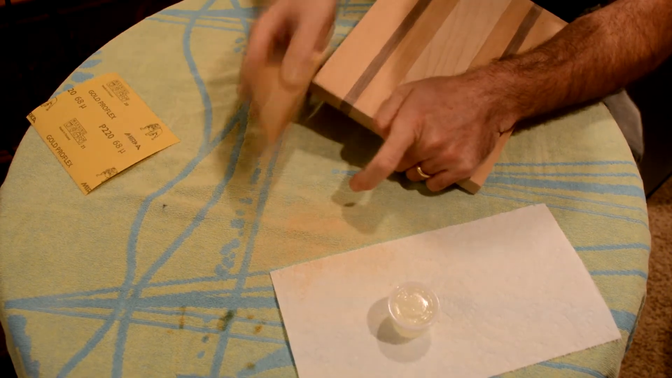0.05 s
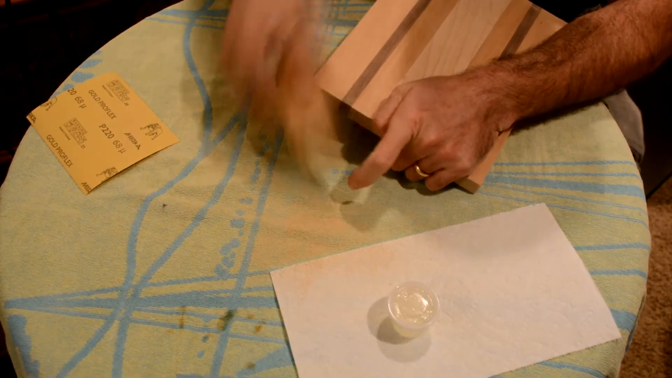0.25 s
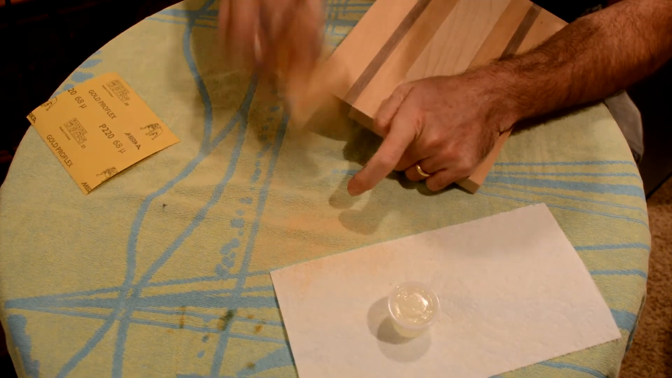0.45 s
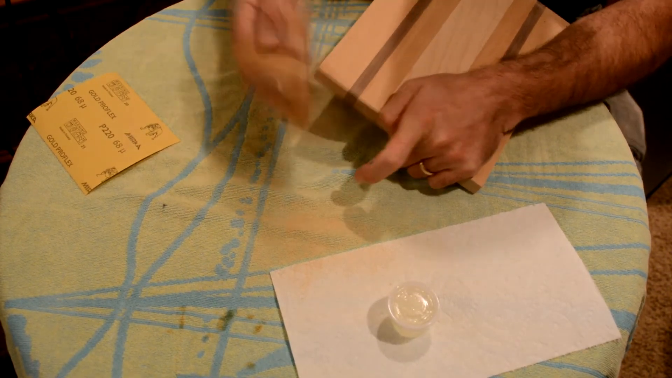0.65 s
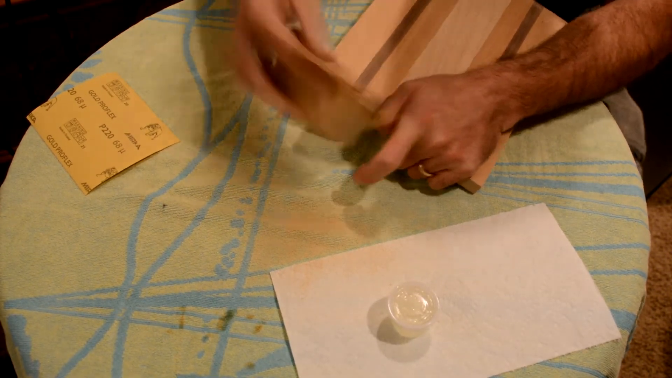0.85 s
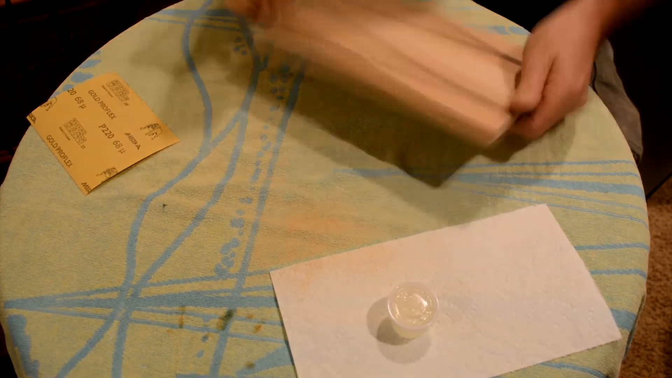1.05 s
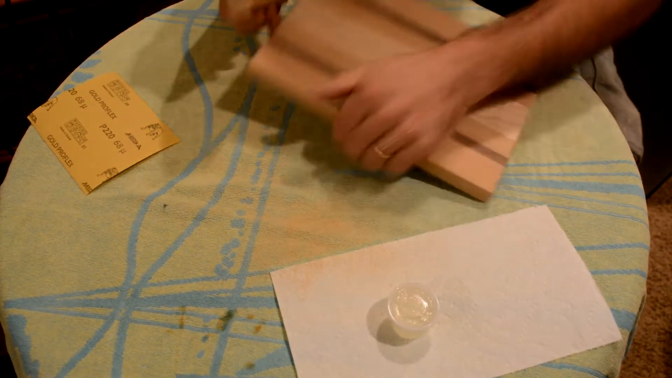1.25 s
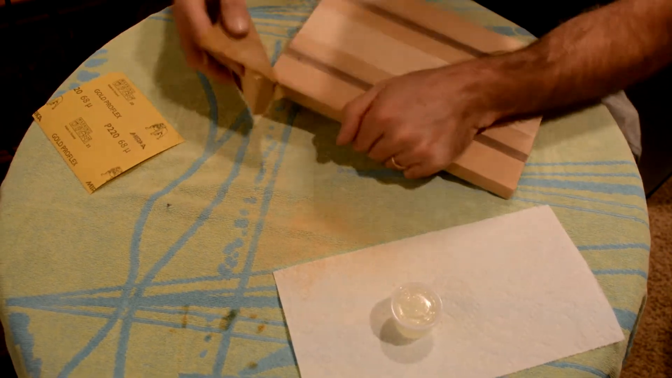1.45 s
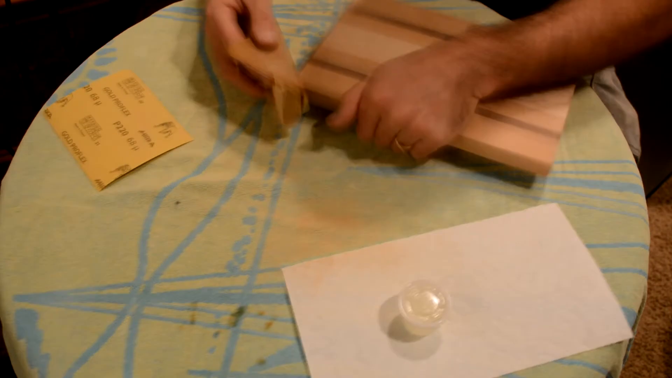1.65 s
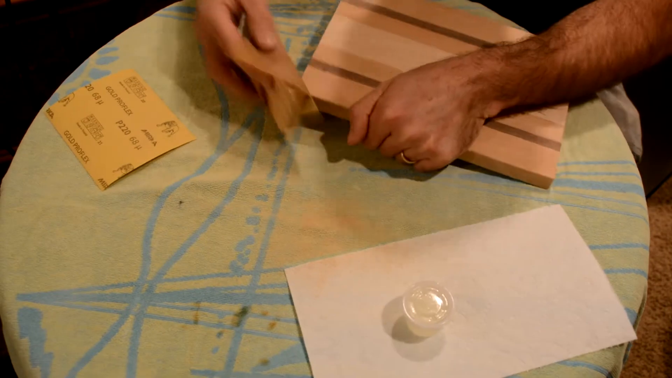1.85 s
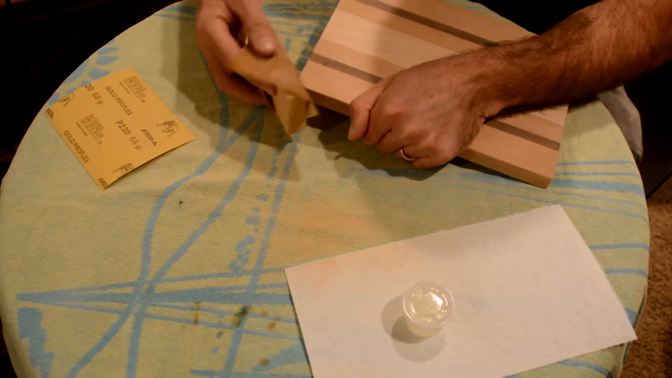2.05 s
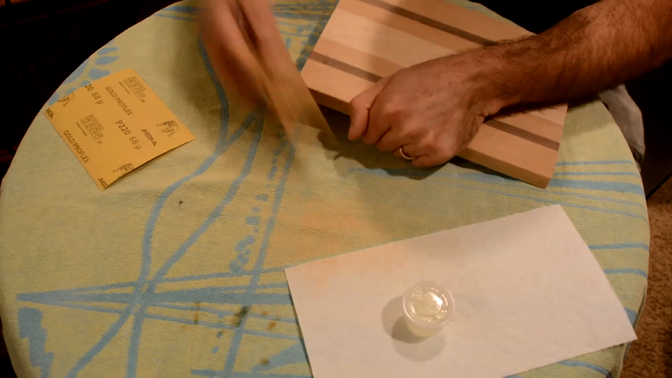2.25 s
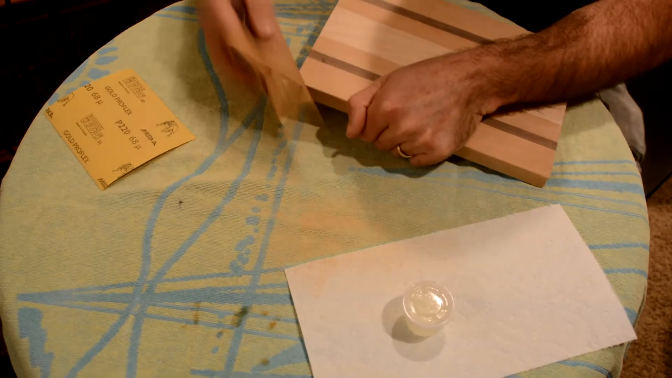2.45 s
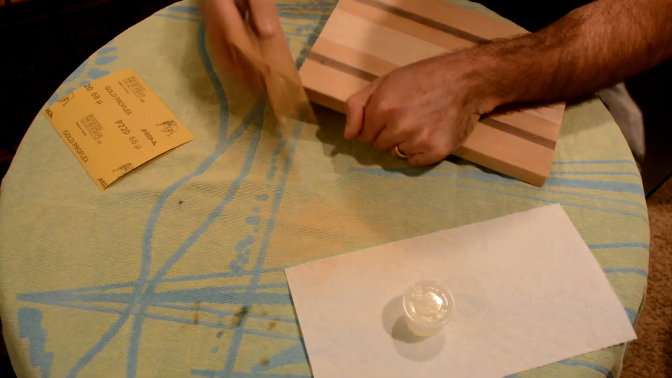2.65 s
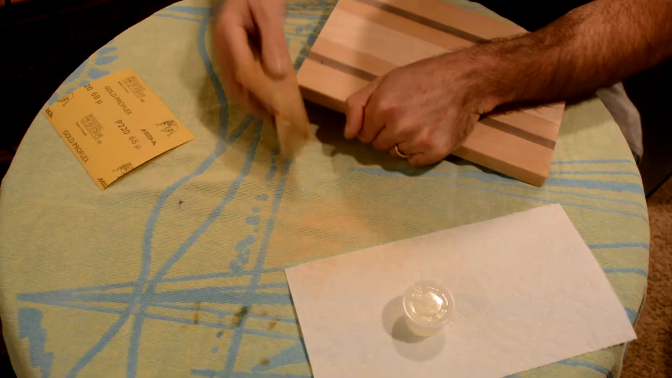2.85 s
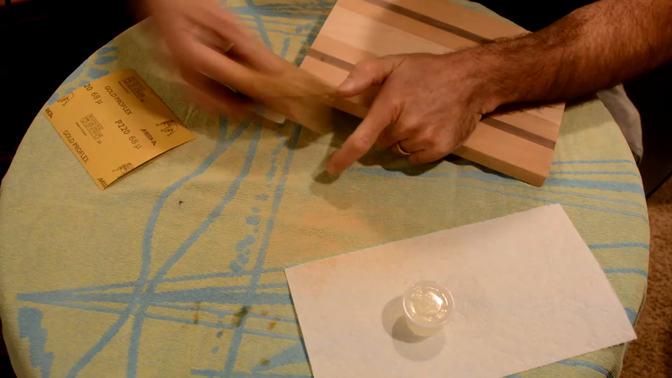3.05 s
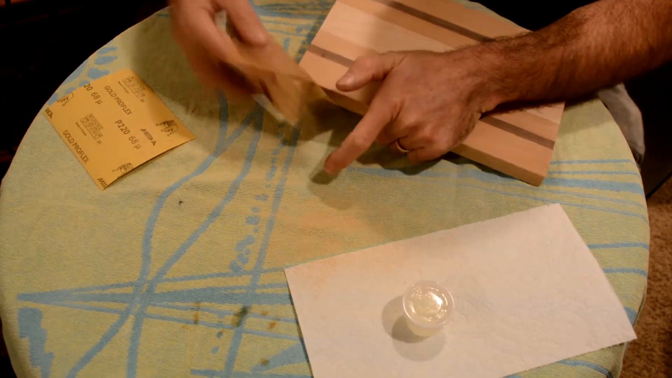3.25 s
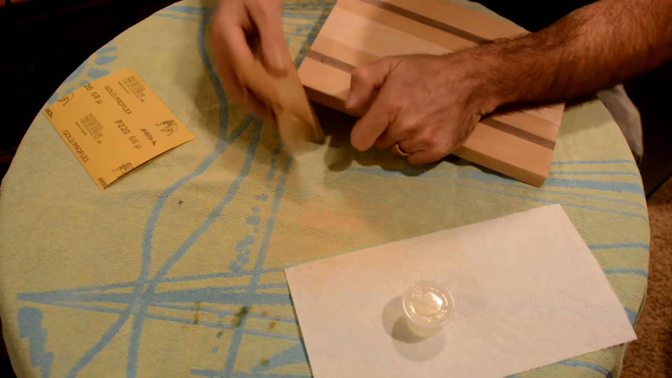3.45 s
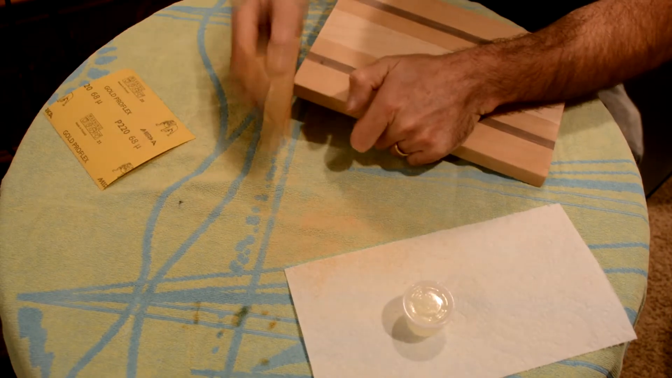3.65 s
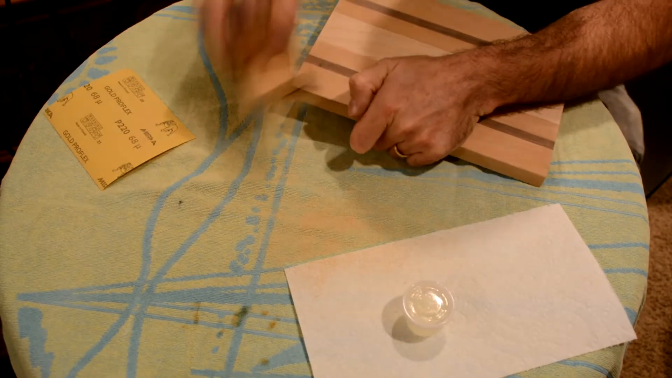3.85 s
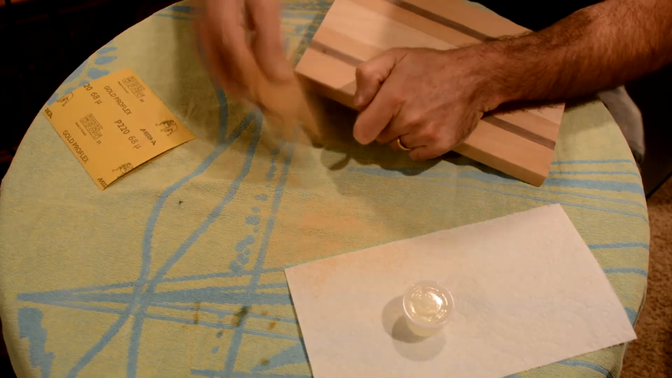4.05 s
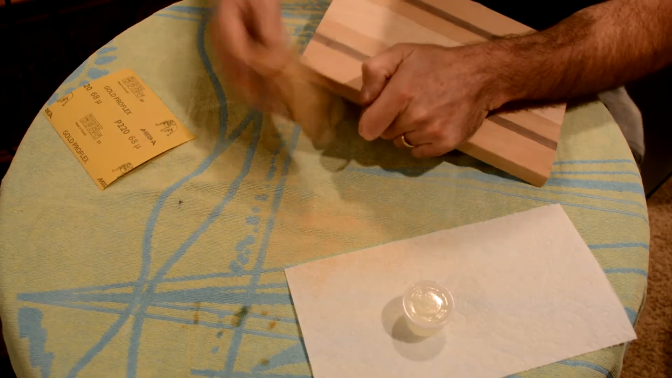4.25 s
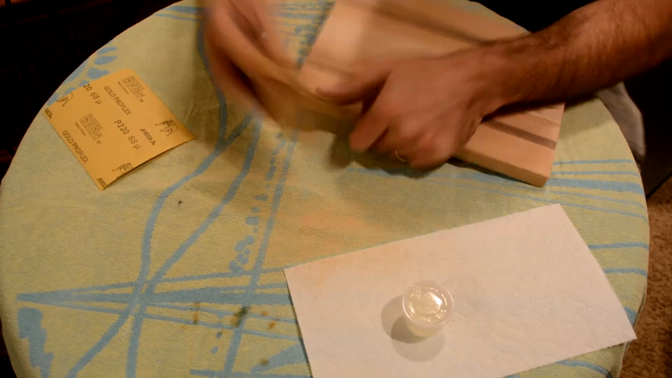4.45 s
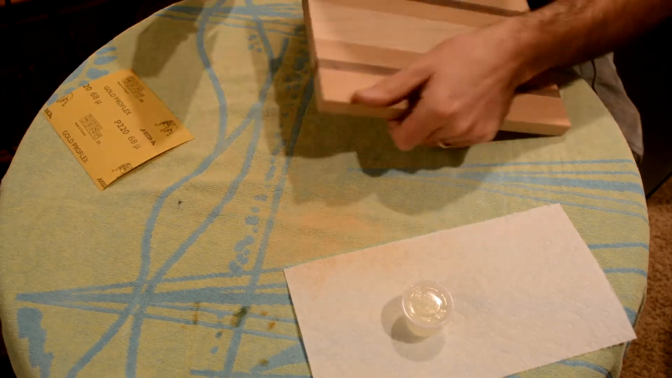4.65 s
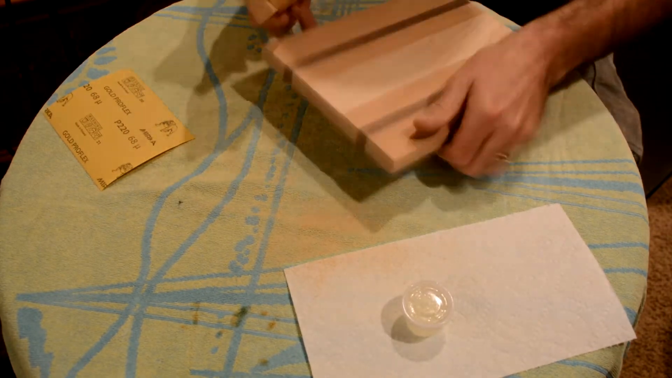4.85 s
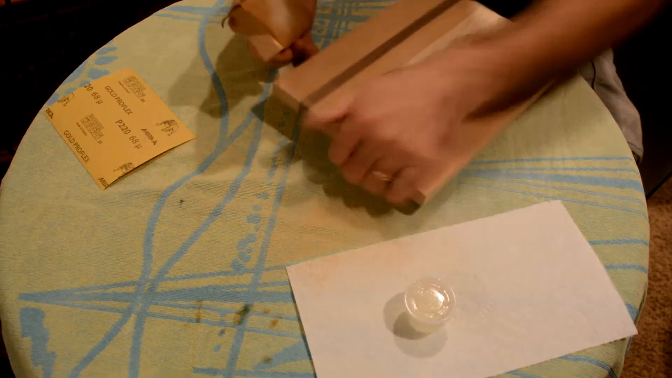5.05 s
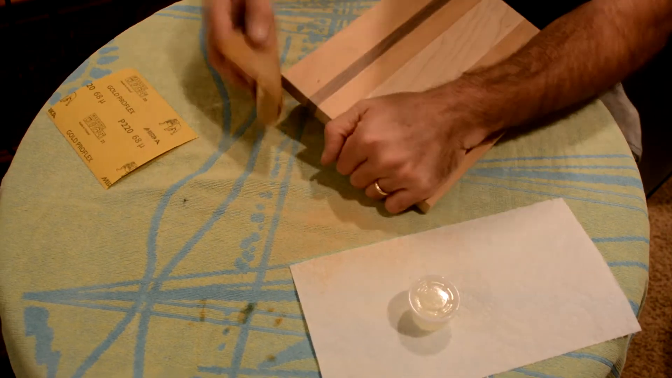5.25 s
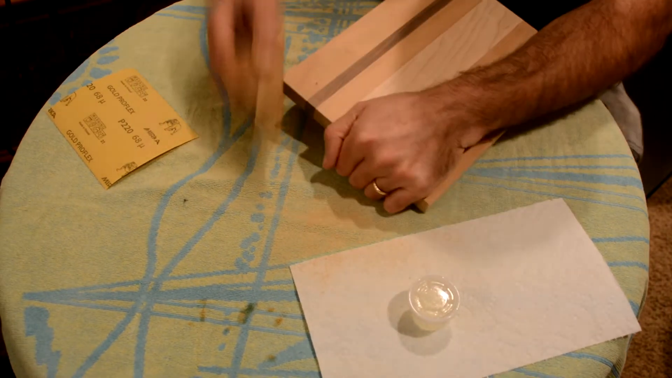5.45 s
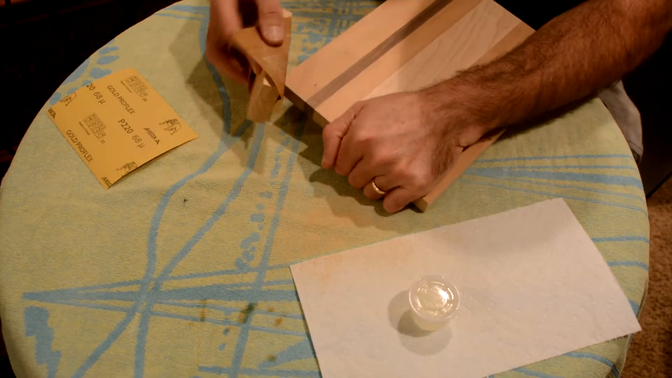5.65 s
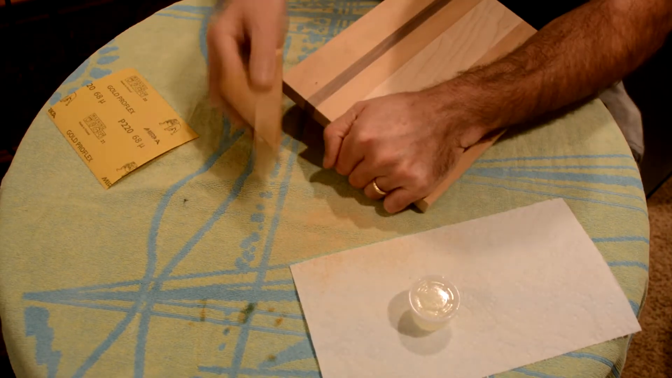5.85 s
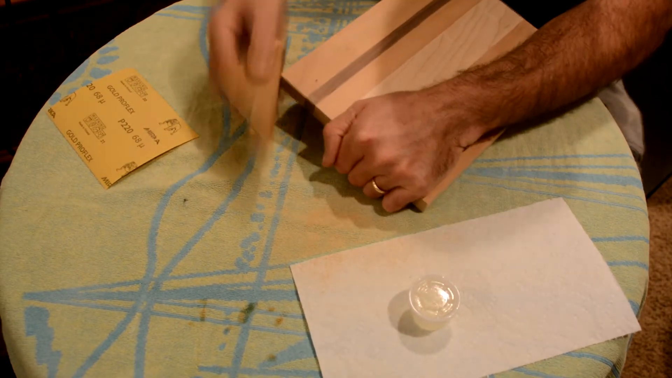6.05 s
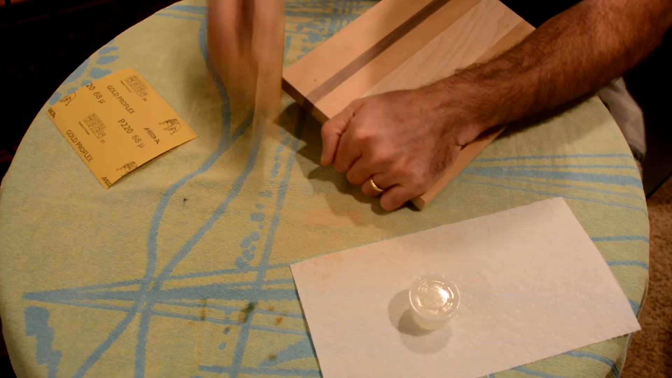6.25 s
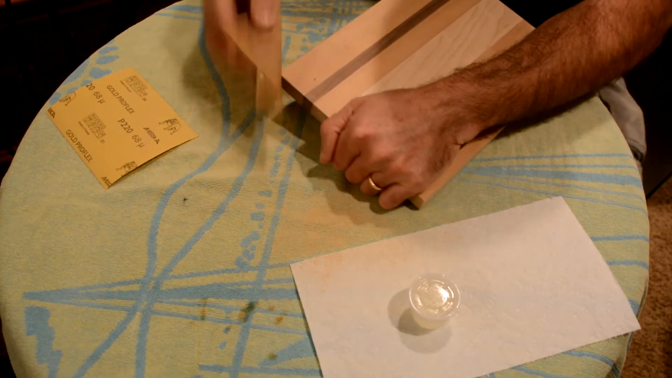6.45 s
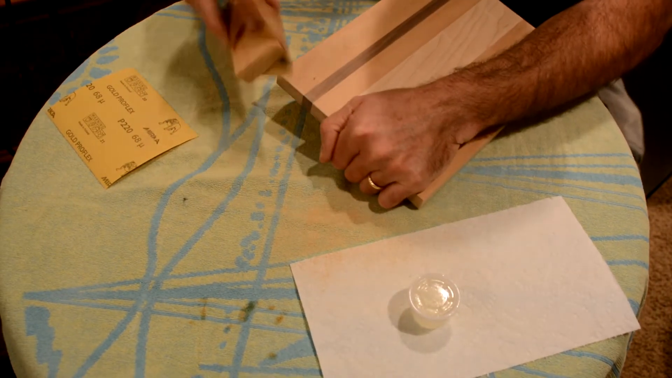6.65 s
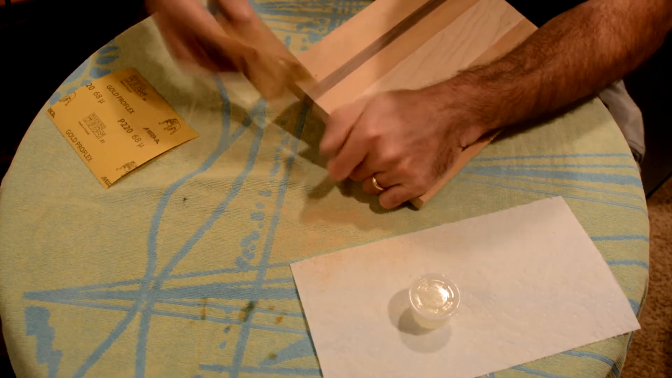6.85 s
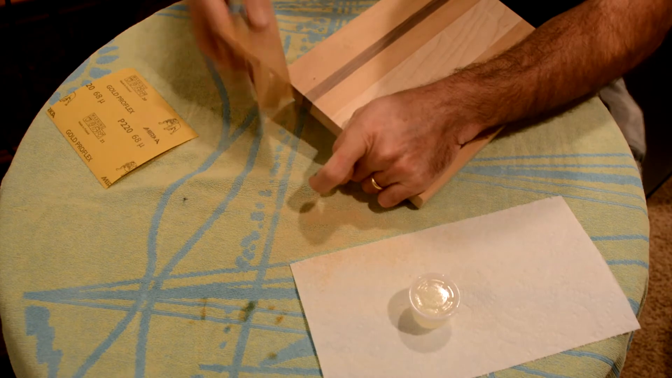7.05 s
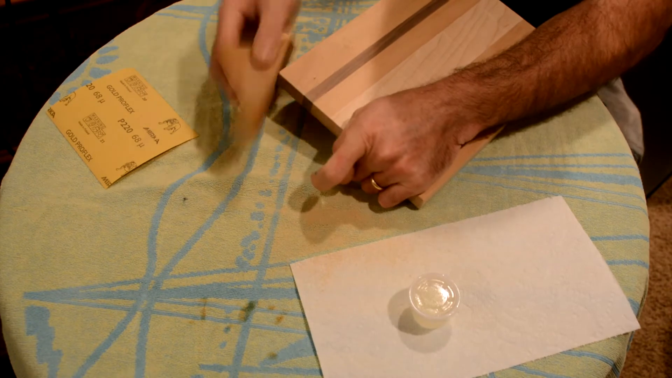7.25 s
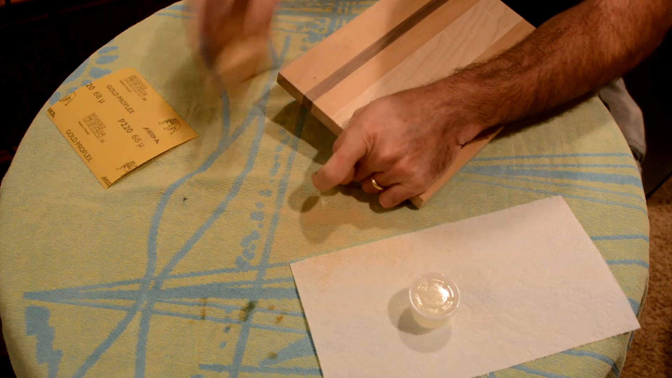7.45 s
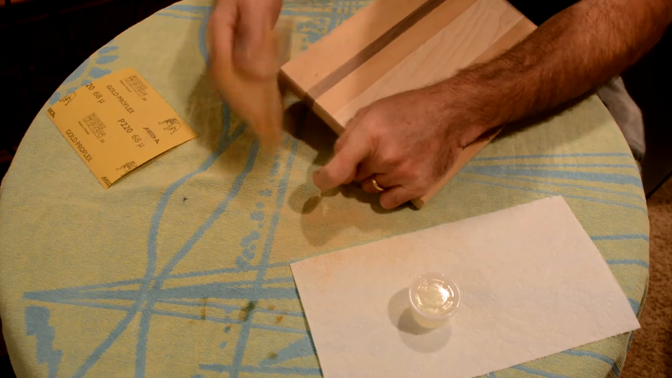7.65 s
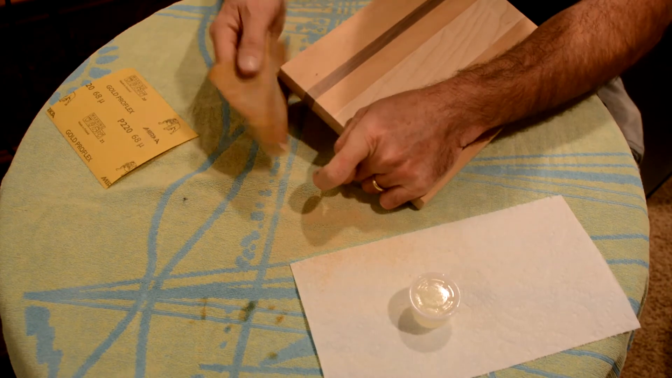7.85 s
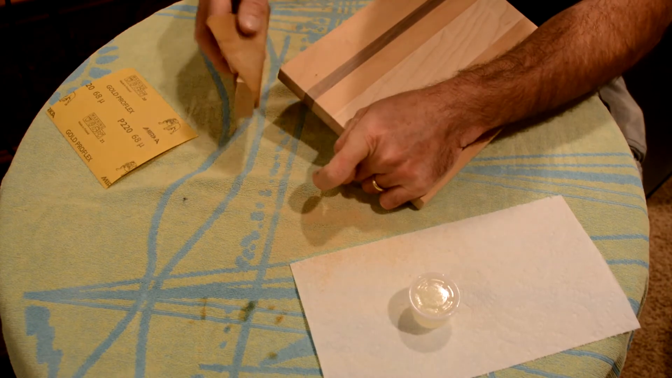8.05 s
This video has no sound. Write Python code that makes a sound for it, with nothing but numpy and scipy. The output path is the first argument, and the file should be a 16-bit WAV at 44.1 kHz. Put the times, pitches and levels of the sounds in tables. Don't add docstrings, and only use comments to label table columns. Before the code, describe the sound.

Folded sandpaper rasps in fast back-and-forth runs along a small hardwood board's edge, with pauses as the board is turned and thuds on a padded table.

```python
import sys
import numpy as np
from scipy import signal
from scipy.fft import rfft, irfft, next_fast_len
from scipy.io import wavfile
from scipy.ndimage import uniform_filter1d

SR = 44100
rng = np.random.default_rng(int(sys.argv[2]) if len(sys.argv) > 2 else 0)


def materialize(psi):
    bounded = np.clip(np.atleast_2d(psi).T, -1, 1)
    quanta = np.round(bounded * 32767).astype(np.int16)
    wavfile.write(sys.argv[1], SR, quanta)


def ratio_of_db(decibels):
    return 10 ** (np.asarray(decibels, float) / 20)


N = 357651
SIZE = next_fast_len(N)
HZ = np.fft.rfftfreq(SIZE, 1 / SR)
T = np.arange(N) / SR


def evened(x):
    return x / np.sqrt(np.mean(x ** 2) + 1e-20)


def read(points, at):
    hz, value = np.transpose(points)
    return np.interp(np.log(at + 1), np.log(hz + 1), value)


def shaped(x, gain):
    return irfft(rfft(x, SIZE) * gain, SIZE)[..., :N]


def add(mix, start_s, sound):
    part = mix[..., round(start_s * SR):][..., :sound.shape[-1]]
    part += sound[..., :part.shape[-1]]


def knock(level_db, pitch_hz, t60_s, rise_s):
    t = np.arange(8000) / SR
    decay = ratio_of_db(level_db - 60 * t / abs(t60_s))
    return -decay * (1 - np.exp(-t / rise_s)) * np.sin(2 * np.pi * pitch_hz * t)


# first_s, middle_s, last_s
RUNS = [
    (0.016, 0.092, 0.168),
    (1.852, 1.964, 2.075),
    (2.277, 2.603, 2.909),
    (3.048, 3.465, 3.868),
    (4.19, 4.343, 4.484),
    (5.441, 5.533, 5.624),
    (5.803, 6.238, 6.653),
    (6.874, 7.187, 7.472),
]
RUN_STROKES = [5, 6, 15, 23, 7, 5, 19, 15]
# rasp_db, ring_rel_db, fizz_rel_db
PUSH = [(-40, -1, -3), (-42.5, 4, -6), (-42, 1, -2), (-43.5, 1.7, -3.5), (-42, 1.5, -2.7), (-42, -1.5, -4),
        (-41, -3.5, -5.5), (-41.5, -4, -7.5)]
# rasp_db, ring_rel_db, fizz_rel_db
PULL = [(-43, -3, -3.5), (-43, 2.3, -5), (-44.5, 1, -0.5), (-47, 2, 0), (-51, -1, 5.5), (-38.5, -5.5, -6),
        (-40.5, -4, -2.5), (-43.5, -6.5, -4)]
# first_stroke_db, last_stroke_db, ring_drift_db, first_fizz_db
EFFORT = [(-5.5, -2, -4, -3), (-10.5, -6.5, 1, -1.5), (-0.3, -0.9, -1, -1.5), (-6, -0.3, -3.5, -2),
          (-4, -1.7, -3, -7.5), (-4, -3, 2, -6.5), (-7.5, -1.5, 0.8, -15), (-2.5, 2, -0.5, -10.5)]
# first_speed_up_ms, last_slow_down_ms
RUN_EDGES = [(30, 30.6), (39, 34.5), (31, 27), (32, 29.7), (37, 38), (29, 27.6), (33, 30), (48.5, 32)]
PRESS_DB = [
    (-0.5, -0.92, -0.5, -0.0, 1.0),
    (2, -2.0, -1, 0.5, 0.5, -0.5),
    (-0.5, 0.5, 1.5, -0.0, -0.5, -1, -0.5, 0, -1, 0.5, -1, -2, 1.5, -1.5, -0.0),
    (-1, 2, -1, -2.5, 0.5, 0.5, 1, 0, 0.5, 1, 1, -0.5, -0.5, -2.5, 1.5, -0.5, 0.5, 1.0, -0.5, -1, 0.5, -1, 0.5),
    (0, -1.5, 2.5, -0.5, -0.5, 0.5, -0.0),
    (-2, 2, 0.5, -2.5, 1.5),
    (0.0, -0.61, 1.5, 0.22, -0.5, -0.7, 0.9, -1.0, 0.5, -1.0, -0.4, -0.066, -1.2, 1.5, -0.0, 0.22, -0.9, 1.5, 0.5),
    (-1, -1, 1.5, 1.5, -2.0, 0.5, 0, 0.5, -0.5, 0.5, -1, 0.5, -1.5, -0.5, 0),
]
# full_speed_s, rasp_db, ring_rel_db, speed_up_ms, slow_down_ms
SWIPES = [(0.307, -45, -1, 34, 53), (0.431, -46, 0.5, 50, 32), (0.534, -47.5, 1.5, 48, 31),
          (0.681, -43.5, -0.5, 54, 43), (0.797, -43.5, 0, 57, 30.5), (0.897, -39, -2.5, 42, 27),
          (1.568, -53.5, 7.5, 96, 27), (5.39, -52, -2.5, 36, 36), (3.986, -43, 4, 35, 41.5),
          (4.099, -46.5, 4.5, 42, 28.4), (7.605, -42.5, -3, 49, 30.5), (7.701, -44, -4, 36, 56),
          (7.916, -34.5, -5.5, 89, 70), (7.956, -38, -3.5, 25, 105)]
# rel_db, late_ms
SWIPE_FIZZ = [(-.5, 3), (.5, 3), (-.5, 3), (-.5, 18), (.5, -3), (.5, 8), (.5, 3), (.5, -3), (.5, -3),
              (.5, 8), (-.5, 8), (-.5, 10), (.5, 3), (.5, 3)]
# full_speed_s, rasp_db,
# ring_rel_db, fizz_rel_db, half_length_ms
TRIES = [(1.457, -50.5, -3, -1.5, 24), (4.83, -64, -13, -22, 51), (4.995, -75, -7, -0.5, 190),
         (5.315, -58.5, -2, -9, 47), (5.005, -68, -5, 2, 22), (1.614, -48.5, 5.5, -9, 34),
         (1.669, -57, 2, -3.5, 32), (1.724, -45, -1.5, -11, 25), (1.783, -54.5, 0, -6, 38),
         (2.232, -51.5, 5, -7, 27.5), (2.956, -53, 3, -4, 57), (4.535, -71.5, -7, -1, 34),
         (0.628, -67, 2, -1.2, 21), (7.835, -51.5, 0, -7, 41), (5.668, -57, 1.5, -6, 26),
         (5.745, -70, -3, -8, 25), (8.047, -51.5, -5, -0.5, 53)]
# full_speed_s, rasp_db, ring_rel_db, half_length_ms
SLIDES = [(0.978, -67, -5, 22), (1.045, -62.5, -3, 40), (1.124, -67, 7, 44), (1.163, -64.5, -6.2, 33),
          (1.203, -68, -5, 34), (1.243, -67.5, 3.5, 32), (1.346, -64.5, -7, 41), (1.414, -75, 2, 42),
          (1.49, -62.5, 4, 30), (2.166, -59.5, 9.5, 23.6), (4.768, -72, -15, 38), (5.078, -63.5, -4, 29),
          (5.123, -69, -3, 29), (5.17, -71, -3, 37), (5.242, -74.5, -10, 52), (5.76, -71.5, 1, 33),
          (6.815, -61.5, 0.1, 51)]
GRIP_ENDS = [.24, .95, 1.42, 3.01, 3.92, 4.6, 5.25, 6.72, 7.78]
GRIP_FIZZ_DB = [-6, -12, -5, -6, -5, -7.5, -6, -14, -16, -14.5]


def strokes(overlap=0.69, wind_up=1.2, wind_down=0.76, fizz_lag=1.95, uneven_db=0.92):
    def grip_fizz(s):
        return GRIP_FIZZ_DB[np.searchsorted(GRIP_ENDS, s)]

    rows = []
    for (s, db, ring_db, up, down), (more_db, late) in zip(SWIPES, SWIPE_FIZZ):
        rows.append((s, db, ring_db, grip_fizz(s) + more_db, up, down, late))
    for s, db, ring_db, half in SLIDES:
        rows.append((s, db, ring_db, grip_fizz(s), half, half, 0))
    for s, db, ring_db, fizz_db, half in TRIES:
        rows.append((s, db, ring_db, fizz_db, half, half, 0))
    runs = zip(RUNS, RUN_STROKES, RUN_EDGES, PUSH, PULL, EFFORT, PRESS_DB)
    for times, n, (up, down), push, pull, effort, press in runs:
        first_db, last_db, drift_db, dull_db = effort
        k = np.arange(n)
        along = k / (n - 1)
        s = np.polyval(np.polyfit([0, .5, 1], times, 2), along)
        start, end = np.exp(-k / wind_up), np.exp(-k[::-1] / wind_down)
        levels = np.where(k % 2, np.array(pull)[:, None], np.array(push)[:, None])
        db, ring_db, fizz_db = levels + uneven_db * rng.standard_normal((n, 3)).T
        db = db + np.array(press) + first_db * start + last_db * end
        ring_db = ring_db + drift_db * (along - .5)
        fizz_db = fizz_db + dull_db * np.exp(-(k / fizz_lag) ** 2)
        gaps = overlap * 1000 * np.diff(s)
        rows += zip(s, db, ring_db, fizz_db, [up, *gaps], [*gaps, down], 0 * s)
    return rows


LANDING_T60 = 0.021
# start_s, peak_db, pitch_hz
LANDINGS = [(0.285, -29, 1130), (0.387, -31, 1150), (0.494, -34, 310), (0.7425, -28.5, 566),
            (0.8455, -28, 583), (3.95, -29, 694), (4.064, -25, 715), (4.153, -33.5, 689),
            (6.777, -38.5, 894), (7.554, -41, 740), (7.667, -34.5, 689), (7.811, -24.5, 700)]


def speeds(round_power=(1.3, 1.7, 2.3), graze_db=-20, graze_in=0.92, graze_out=1.14):
    power = np.zeros((3, N)) + 1e-14
    for s, db, ring_db, fizz_db, up, down, late in strokes():
        near = slice(max(round((s - .2) * SR), 0), round((s + .2) * SR))
        shift = late * np.array([[0], [0], [1]])
        ms = (T[near] - s) * 1000 - shift
        u = ms / np.where(ms < 0, up + shift, np.maximum(down - shift, 10))
        swing = abs(np.cos(np.pi / 2 * np.clip(u, -1, 1))) ** np.array(round_power)[:, None]
        swing += ratio_of_db(graze_db) * np.exp(-(u / np.where(ms < 0, graze_in, graze_out)) ** 2)
        power[:, near] += (ratio_of_db(db + np.array([[ring_db], [0], [fizz_db]])) * swing) ** 2
    t = T[:4000]
    for s, db, hz in LANDINGS:
        blow = ratio_of_db(db + np.array([[-9], [-22], [-30]]) - 60 * t / (4.0 * LANDING_T60))
        add(power, s, blow ** 2 * np.minimum(t / 0.0045, 1) ** 2)
    return np.sqrt(power)


def grit(spread_db=2.0, chatter_db=0.67, patchy_db=1.4):
    size = ratio_of_db(spread_db * np.minimum(rng.exponential(1, (2, N)), 4))
    chatter = evened(uniform_filter1d(rng.standard_normal(N), size=150))
    tearing = size * rng.standard_normal((2, N)) * ratio_of_db(chatter_db * chatter)
    z = signal.stft(tearing, nperseg=512)[2]
    patches = rng.standard_normal(z.shape[:0:-1])
    patches = uniform_filter1d(patches, size=7, axis=0)
    patches = uniform_filter1d(patches, size=3, axis=1)
    return signal.istft(z * ratio_of_db(patchy_db * evened(patches).T), nperseg=512)[1][:, :N]


# pitch_hz, level_db (per Hz)
COLOURS = [
    [(150, -41), (250, -18), (1410, -8.5), (2710, -11), (4550, -7), (10800, -11), (15500, -13.5)],
    [(150, -57), (250, 3.5), (442, -8), (553, 2), (1160, -4.5), (2320, -17), (5130, -23), (15500, -30)],
    [(150, -55), (250, -27), (681, -2), (781, -15), (1100, -12.4), (9000, -33), (15500, -36)],
    [(150, -53), (250, -8.5), (635, -2.5), (1050, -7.5), (2490, -11.5), (3060, -1.5), (10000, -16.5),
     (15500, -25)],
    [(150, -53), (250, -9.5), (560, -3.5), (1050, -8), (2490, -12), (3060, -1.5), (10000, -15.5),
     (15500, -23)],
    [(150, -47), (250, -3.5), (544, -5.5), (669, 0.5), (1270, -7), (2570, -12), (3220, -10), (15500, -37)],
    [(150, -55), (250, -22), (1250, -11), (1460, -13.5), (2620, -15), (15500, -23)],
    [(150, -31), (250, -5), (950, 4.5), (1270, -6), (1990, 0), (3450, -12.5), (10400, -20.5),
     (15500, -27.5)],
    [(150, -31), (250, -3), (800, 1), (1270, -5.5), (1990, -0.5), (3450, -13), (10400, -20.5),
     (15500, -27.5)],
    [(150, -37), (250, 13.5), (614, -2), (882, -5.5), (1360, -16.5), (1700, -22), (3110, -23), (15500, -48)],
]
# pitch_hz, width_hz, level_db
MODES_BY_GRIP = [
    [(1090, 56, -11), (3350, 21, 2), (4620, 220, -6)],
    [(1150, 13, 2), (2120, 42, -1.5), (3200, 240, -3.5), (4070, 190, 1), (5130, 49, 2)],
    [(3190, 93, 3.5), (4370, 59, 7)],
    [(740, 210, 1.5), (949, 4.9, 8.5), (1200, 240, 5.5), (1673, 8.3, 7.5), (2100, 140, -3), (3060, 100, -5),
     (5010, 260, -5.5)],
    [(700, 212, 1.5), (951, 5.3, 9.5), (1230, 250, 5.5), (1671, 8.3, 6), (2115, 140, -3.5), (3090, 120, -7),
     (5060, 300, -6.5)],
    [(689, 64, -5), (965, 15, 2), (1246, 110, 4.5), (1660, 11, 2), (3180, 180, 3), (4860, 470, -3)],
    [(3160, 120, -3), (3500, 37, -10)],
    [(740, 96, -15.5), (1424, 7.4, -5.5), (2120, 250, -14), (3074, 68, 2), (3850, 250, -4.5),
     (4620, 870, -9)],
    [(740, 96, -12), (1440, 30, -4), (2100, 300, -10), (3072, 90, 1), (3850, 230, -5), (4620, 900, -8.5)],
    [(894, 32, 13.5), (1130, 22, 14.5), (1370, 87, 8), (1960, 180, 3), (2930, 200, -1.5)],
]
# pitch_hz, likeness (0 to 1)
SAME = [(180, 0.68), (550, .96), (4000, 0.92), (9500, 0.92), (13000, 0.76)]
# pitch_hz, level_db
LEAN = [(60, 15), (380, 1.5), (2380, 0.5), (15000, -1)]


def wood(drive, ring_out_db=5):
    grip = np.searchsorted(GRIP_ENDS, T)
    low = 1 / (1 + (HZ / 1500) ** 12)
    high = 1 / (1 + (7000 / (HZ + 1)) ** 6)
    bands = np.sqrt(abs(np.array([low, 1 - low - high, high])))
    same = np.clip(read(SAME, HZ), 0, 1)
    side = np.sqrt((1 - same) / (1 + same))
    a, b = rfft(drive, SIZE)
    pair = np.array([a + side * b, a - side * b]) * ratio_of_db(np.outer([.5, -.5], read(LEAN, HZ)))
    out = np.zeros((3, 2, N))
    for k, (colour, modes) in enumerate(zip(COLOURS, MODES_BY_GRIP)):
        body = 1
        for hz, width, db in modes:
            body = body + ratio_of_db(db + ring_out_db) / (1 + 2j * (HZ - hz) / (abs(width) + 30))
        for band, gain in zip(out, bands):
            x = irfft(pair * ratio_of_db(read(colour, HZ)) * body * gain, SIZE)[:, :N]
            band += (grip == k) * x / np.sqrt(np.mean(x.mean(0) ** 2))
    return out


# start_s, peak_db, pitch_hz, t60_s
THUDS = [(1.121, -25.5, 175, 0.028), (1.15, -27.5, 62, 0.046), (1.232, -37, 108, 0.16),
         (1.245, -17.5, 136, 0.023), (1.262, -32, 44.3, .12), (1.381, -42, 38, 0.27),
         (1.747, -20.5, 112, 0.032), (1.775, -34, 45, 0.13), (4.888, -30, 120, 0.027),
         (4.9, -24, 114, 0.044), (4.925, -39, 106, 0.12), (1.123, -24, 440, 0.013),
         (4.9, -33.5, 490, 0.037), (4.925, -43, 178, 0.18), (4.96, -50, 124, .3), (4.9, -50, 660, .03),
         (5.778, -43, 191, .08), (1.45, -44.5, 140, .1), (1.249, -31, 280, .035), (1.31, -44, 70, .25),
         (7.67, -38, 240, .06)]
# start_s, peak_db, crisp_rel_db, rustle_rel_db
SNAPS = [(0.9807, -28, -2, -18), (3.0201, -45, 10, 0), (3.9540, -44, -4, -10), (7.7940, -40, 4, -4),
         (5.658, -54, 13, 6), (5.676, -55, 12, 4), (5.2829, -66, 17, 8), (5.2989, -57, 18, 6),
         (7.8067, -44, 2, -2), (7.8372, -52, 14, 3), (0.9632, -64, 8, 4), (2.2190, -58, 9, 2),
         (1.4464, -56, 9, 2), (7.8205, -59, 14, 4), (.7585, -52, 10, 2), (.8590, -53, 10, 2),
         (6.7760, -56, -4, -2), (1.1235, -50, -20, -20)]
SNAP_HZ = (1300, -3800)


def hits(thud_spread=.04, snap_t60=.004, rustle_t60=.015, crisp_hz=10500):
    out, t = np.zeros((2, N)), np.arange(800) / SR
    for s, db, hz, t60 in THUDS:
        ports = hz * (1 + thud_spread * np.array([[1], [-1]]))
        thud = knock(db, ports, t60, 0.0024) + knock(db - 28, 3.2 * ports, 0.055, 0.0021)
        add(out, s, thud * ratio_of_db([[1.4], [-1.4]]))
    for s, db, hz in LANDINGS:
        edge = knock(db + 1.5, hz, LANDING_T60, 0.0022)
        add(out, s, edge + knock(db - 9.0, 0.43 * hz, LANDING_T60, 0.0012))
    noises = rng.standard_normal((len(SNAPS), 2, 801))
    for (s, db, crisp_db, rustle_db), noise in zip(SNAPS, noises):
        crisp = knock(crisp_db + 1, crisp_hz * (1 + .08 * noise[0, 0]), .0015, .00002)[:800]
        rustle = ratio_of_db(rustle_db - 4 - 60 * t / rustle_t60) * (noise[1, 1:] - .5 * noise[1, :-1])
        body = sum(knock(db - 3, hz, snap_t60, .0001)[:800] for hz in SNAP_HZ)
        add(out, s, ratio_of_db(db) * (crisp + rustle) + body)
    return out


# start_s, level_db, pitch_hz, width_hz, length_s
SQUEAKS = [(1.02, -56, 1115, 60, 0.042), (1.024, -64, 2880, 140, 0.045), (1.074, -66.5, 860, 60, .046),
           (1.71, -41.5, 1160, 110, 0.03), (1.706, -49, 560, 160, 0.033), (1.712, -52, 1750, 120, .028),
           (1.72, -53, 2030, 100, .014), (1.785, -55, 1200, 150, .016), (1.709, -53, 3100, 250, .034),
           (1.316, -71, 4350, 120, 0.05), (1.319, -65.5, 680, 50, 0.027), (4.745, -71, 3500, 90, 0.044),
           (4.803, -67.5, 1445, 20, .156), (4.805, -68, 1450, 60, .045), (4.81, -70, 3100, 150, 0.06),
           (4.805, -69, 2160, 200, .05), (4.81, -75, 1110, 50, .07), (4.985, -69, 1440, 50, 0.04),
           (5.085, -76.5, 2850, 60, 0.085), (5.098, -76.5, 5250, 80, .035), (5.02, -73, 1450, 30, 0.08),
           (4.128, -60.5, 680, 60, 0.035), (5.105, -70, 1470, 90, .025), (5.137, -71, 1500, 120, .02),
           (5.1, -76, 1180, 60, .07), (4.925, -78, 2850, 60, .06), (4.75, -77, 5000, 150, .04),
           (5.0, -78, 3150, 70, .09), (1.14, -70, 2050, 120, .04), (1.195, -71, 1450, 80, .022),
           (1.225, -72, 1450, 80, .03), (1.23, -67, 3150, 150, .035), (1.05, -69, 3300, 100, .03),
           (1.14, -66, 680, 80, .03), (.61, -62, 620, 70, .03), (4.27, -45, 1300, 200, .04)]


def squeaks():
    out = np.zeros(N)
    noises = rng.standard_normal((len(SQUEAKS), 2, 12000))
    for (s, db, hz, width, length), noise in zip(SQUEAKS, noises):
        keep = np.exp(-np.pi * abs(width) / SR)
        push = 1.6 * (1 - keep) + (noise[0] + 1j * noise[1]) * np.sqrt(1 - keep)
        slip = signal.lfilter([1], [1, -keep], push)[3000:]
        tone = evened((slip * np.exp(2j * np.pi * hz * T[:9000])).real)[:round(length * SR)]
        add(out, s, ratio_of_db(db) * tone * signal.windows.tukey(len(tone), .3))
    return out


SHAKE_DB = [-14, -5.5, -11, -16, -15.5, -11, -13, -9.5, -7.5, -8]
# pitch_hz, level_db (per Hz)
RUMBLE = [(12, -46.5), (20, -33), (113, 4), (141, -1), (177, 2), (285, -5), (400, -22), (520, -57),
          (880, -120)]
# start_s, level_db
CREAK = [(0.0, -63.5), (1.2, -58), (2.2, -68), (2.7, -59), (3.2, -65), (3.7, -58), (4.3, -65), (4.9, -60),
         (5.3, -67), (6.4, -64), (8.11, -66)]


def table(ring):
    noise = rng.standard_normal((3, N))
    low = evened(shaped(noise[0] + 0.51 * noise[1:], ratio_of_db(read(RUMBLE, HZ))))
    shake = uniform_filter1d(ring, size=600) * ratio_of_db(SHAKE_DB)[np.searchsorted(GRIP_ENDS, T)]
    t = T[:9000]
    for s, db, hz, t60 in THUDS:
        add(shake, s, ratio_of_db(db - 22.0 - 60 * t / 0.13) * np.minimum(t / 0.0041, 1))
    deep_gain = (HZ / 22) ** 2 / (1 + (HZ / 30) ** 3.26)
    deep = evened(shaped(noise[1] + 0.62 * noise[[0, 2]], deep_gain))
    return low * shake + deep * ratio_of_db(np.interp(T, *np.transpose(CREAK)))


def room(x, t60=0.077, wet_db=-17):
    taps = np.zeros((2, 12000))
    at = np.arange(100, 11980, 20) + rng.integers(0, 20, (2, 594))
    np.put_along_axis(taps, at, rng.choice([-1., 1.], at.shape), 1)
    taps = signal.lfilter([1], [1, -.35], taps * ratio_of_db(-60 * np.arange(12000) / SR / t60))
    wet = signal.fftconvolve(x, taps / np.linalg.norm(taps[0]), axes=1)[:, :N]
    return x + ratio_of_db(wet_db) * wet


# pitch_hz, level_db (per Hz)
HUSH = [(12, -60), (20, -22), (32, -28), (44, -8), (65, 0), (137, -9.5), (233, -20), (655, -23),
        (15800, -36)]


def hush(level_db=-70):
    noise = rng.standard_normal((3, N))
    return ratio_of_db(level_db) * evened(shaped(noise[0] + 1.3 * noise[1:], ratio_of_db(read(HUSH, HZ))))


def scene():
    levels = speeds()
    sanding = (wood(grit()) * levels[:, None]).sum(0)
    return room(sanding + hits() + squeaks()) + table(levels[0]) + hush()


def top_cut(x):
    return signal.sosfilt(signal.butter(12, 16500, fs=SR, output="sos"), x)


def record(dry):
    edge = np.clip((15900 - HZ) / 150, .003, 1)
    limited = shaped(dry, edge / (1 + (HZ / 15500) ** 18.0))
    return top_cut(limited)


dry = scene()
out = record(dry)
materialize(out)
```